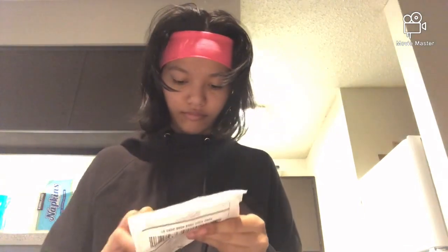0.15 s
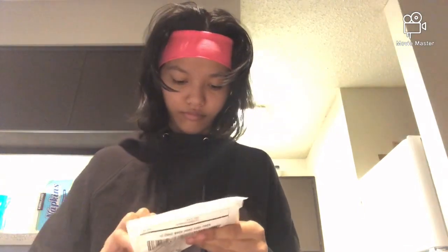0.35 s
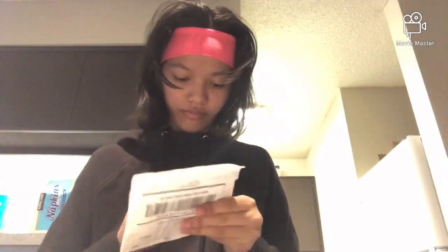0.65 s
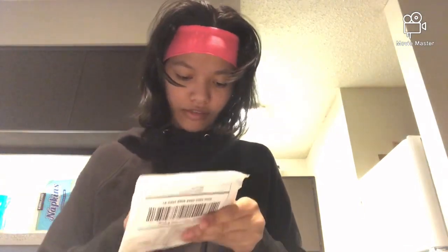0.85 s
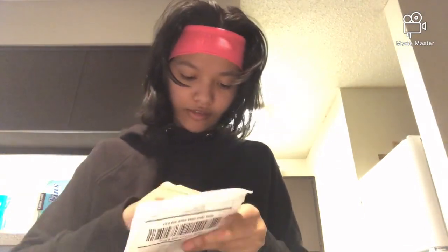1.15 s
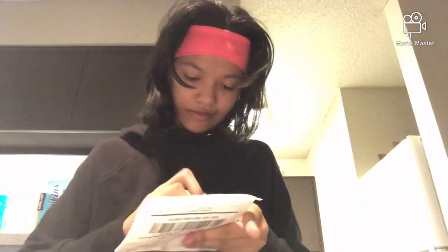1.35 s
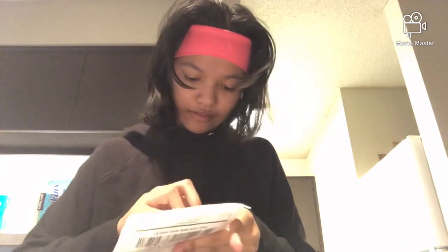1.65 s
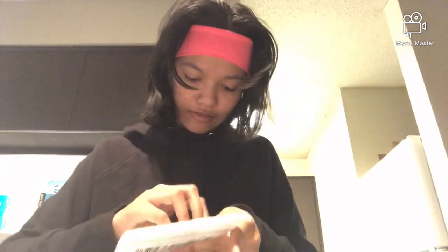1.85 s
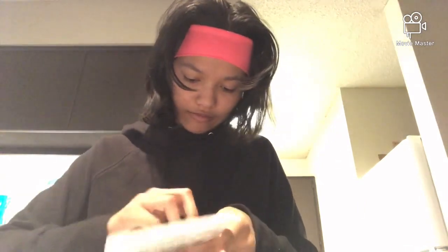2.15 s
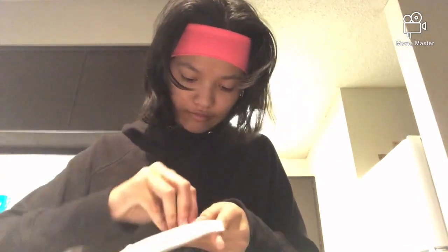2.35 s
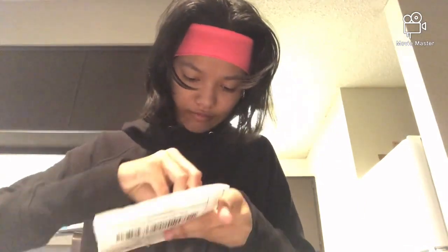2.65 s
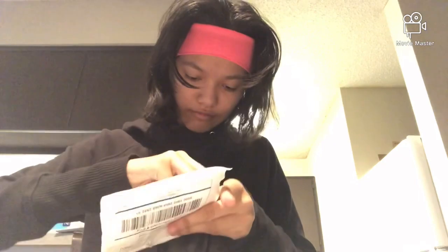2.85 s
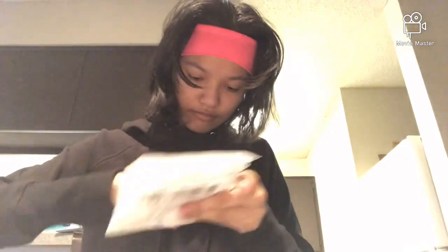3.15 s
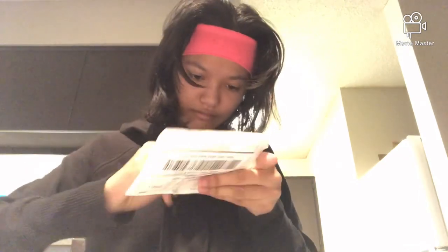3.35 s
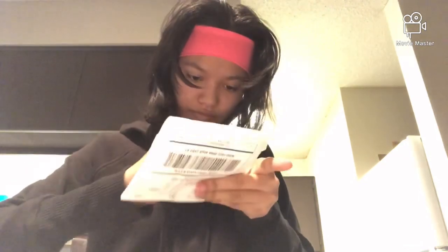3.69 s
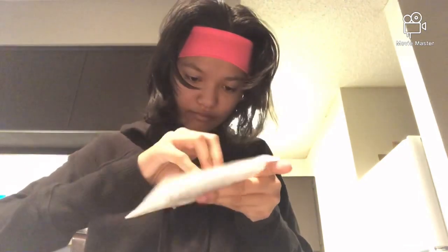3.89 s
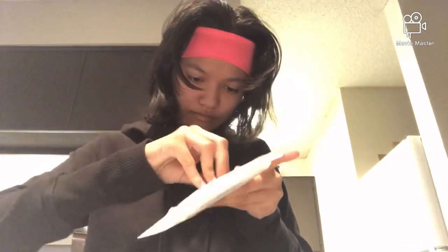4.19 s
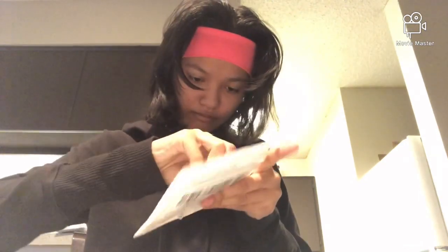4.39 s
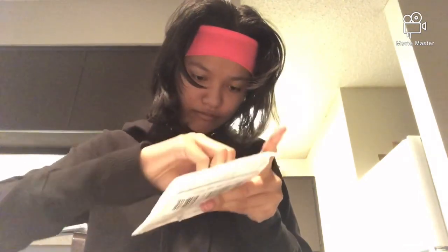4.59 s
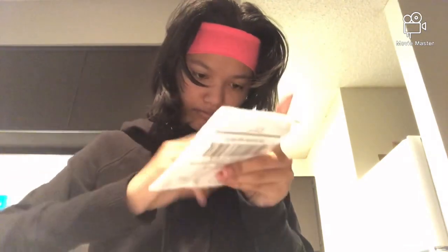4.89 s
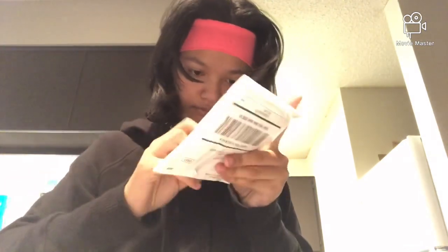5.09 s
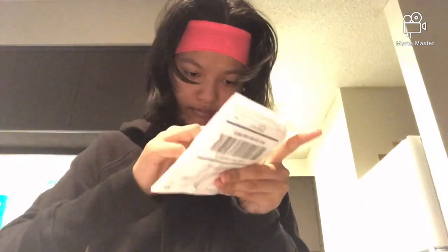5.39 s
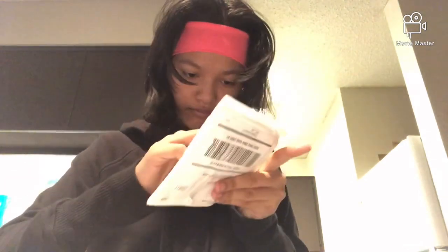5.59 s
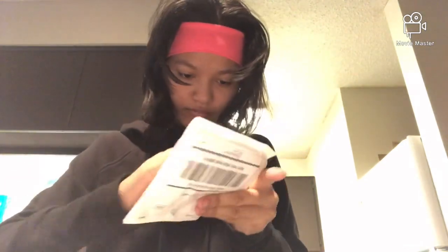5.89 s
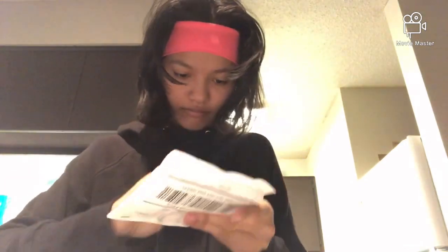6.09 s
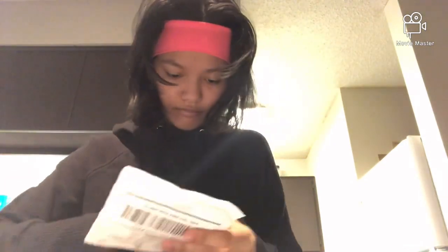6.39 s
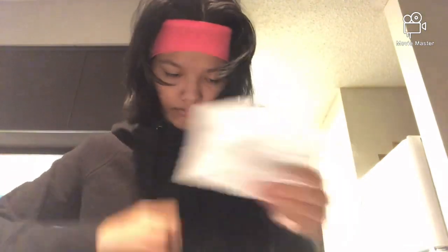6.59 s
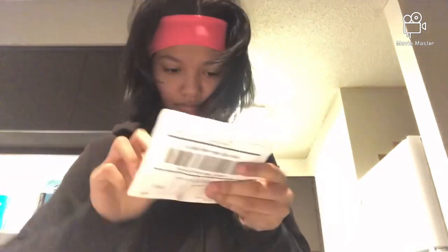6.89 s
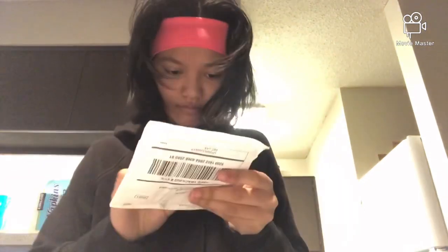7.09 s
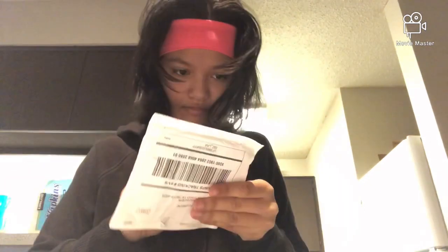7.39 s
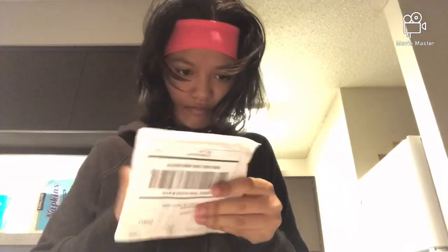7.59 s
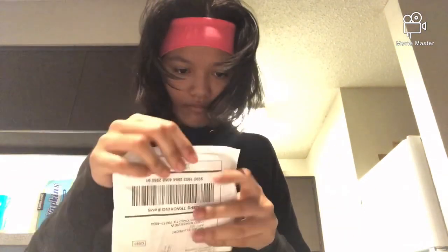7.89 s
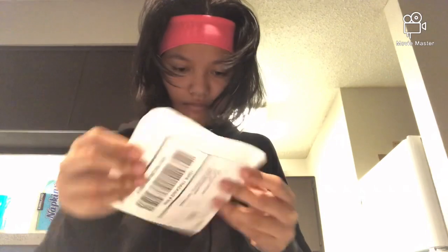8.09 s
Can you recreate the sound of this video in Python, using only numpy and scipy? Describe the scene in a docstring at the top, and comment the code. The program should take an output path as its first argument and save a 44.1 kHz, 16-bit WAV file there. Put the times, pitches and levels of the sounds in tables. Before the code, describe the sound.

Close, crisp paper crinkling in a quiet small room: uneven bursts of rustle, scattered bright ticks, a quieter middle, then one hard snap.

```python
"""Sharp crackles break at once from a dense rustle: hands turn, pick at and tear a paper mailing envelope.
The rustle sums many small buckling patches and rubbing noise, both driven by the strokes of the hands.
Distinct creases buckle singly as pops with bright ticks, and the whole envelope flexes with soft thumps.
Close to a phone in a small, quiet room, the walls answer briefly over a faint steady noise."""
import sys
import numpy as np
from scipy import signal
from scipy.fft import rfft, irfft, next_fast_len
from scipy.io import wavfile
from scipy.ndimage import uniform_filter1d

SR = 44100
rng = np.random.default_rng(int(sys.argv[2]) if len(sys.argv) > 2 else 0)


def wav_out(sig):
    """Save sig, one row per channel (or a flat mono array), as 16-bit PCM at SR to the path in sys.argv[1]."""
    wavfile.write(sys.argv[1], SR, np.round(np.clip(np.atleast_2d(sig).T, -1, 1) * 32767).astype(np.int16))


N = 363825
TIME = np.arange(N) / SR

# Distinct creases buckling, loud or standing alone. Columns: t/s, level over 1 ms/dB,
# nominal pitch of the buckling patch f/Hz, treble tick relative to that level/dB
DISTINCT_CREASES = [(0.0368, -36, 1810, -0.5), (0.0831, -18.5, 1705, -19), (0.2783, -38, 2900, -11),
                    (0.3939, -36.5, 1797, -10), (0.5003, -37, 1990, -5), (0.521, -32.5, 3100, -10.5),
                    (0.5468, -39, 2470, -16), (0.5855, -36.5, 2530, -16), (0.6254, -39.5, 1590, -21),
                    (0.6547, -36, 3500, -10.5), (0.7005, -34.5, 2580, -22), (0.7102, -31, 3970, -25),
                    (0.7464, -39, 2280, -10), (0.7659, -29.5, 2520, -10), (0.7889, -34, 5260, 0.5),
                    (1.0875, -42.5, 1918, -16), (1.1426, -39, 1202, -14), (1.197, -38.5, 1310, -16),
                    (1.2285, -33.5, 2980, -14), (1.2672, -37, 3220, -21), (1.306, -35.5, 3760, -4),
                    (1.4248, -35.5, 3520, -21), (1.4724, -39.5, 2800, -22), (1.485, -43, 3720, -4.5),
                    (1.519, -41, 4000, -5), (1.557, -35, 3300, -19), (1.7704, -35.5, 3130, -13),
                    (1.91, -38.5, 2230, -22), (1.925, -32.5, 4700, -2.5), (1.9883, -36.5, 2100, -14),
                    (1.9924, -36, 3180, -17), (2.1212, -33.5, 3470, -6), (2.141, -41, 2040, -25),
                    (2.1864, -41, 3350, 0), (2.2322, -38, 4870, -6), (2.2608, -38, 2170, -22),
                    (2.3274, -40.5, 4500, -4), (2.4373, -44, 4650, -3), (2.4646, -40, 3450, -18),
                    (2.5153, -40, 3900, -3), (2.7459, -40.5, 1280, -4.5), (2.7987, -40, 4150, -18),
                    (2.872, -37.5, 2090, -9), (2.9547, -35.5, 2500, -35), (2.996, -41.5, 2108, -15),
                    (3.0748, -36.5, 2960, -15), (3.094, -35.5, 2900, -22), (3.3547, -44.5, 1880, -15),
                    (3.4306, -45, 1705, -21.5), (3.4885, -39, 2730, -17), (3.6007, -42, 1300, -21.5),
                    (3.665, -41, 4150, 3.5), (3.6872, -37.5, 2100, -22), (3.798, -40.5, 2300, -4.5),
                    (3.8512, -38.5, 3530, -7), (3.935, -36, 2930, -5), (3.9739, -38, 2490, -6.5),
                    (4.0319, -43, 3450, -0.5), (4.0942, -45, 3100, 2.5), (4.2021, -40, 4190, 2),
                    (4.248, -38.5, 1210, -28), (4.276, -45, 2050, -7), (4.353, -44.5, 2200, -15),
                    (4.465, -43.5, 2800, 1), (4.6143, -30, 1827, -7), (4.651, -33, 2820, -7),
                    (4.8642, -46, 4400, -14), (5.095, -42, 1190, -7.5), (5.2838, -47, 3245, 2.5),
                    (5.3988, -43, 3940, -16), (5.598, -40, 2470, -14), (5.6737, -36.5, 2090, -5),
                    (5.723, -29.5, 2050, -15), (5.8093, -34, 2240, -28), (5.864, -37, 2510, 3),
                    (5.91, -36.5, 1834, -0.5), (5.928, -35.5, 1290, -11), (6.0146, -37, 2643, -10),
                    (6.041, -38.5, 1220, -6.5), (6.1701, -39.5, 1420, -27), (6.2035, -36.5, 2700, -15),
                    (6.212, -37, 4300, -10), (6.2318, -33, 2530, -10), (6.2822, -39.5, 1800, -4.5),
                    (6.3727, -32.5, 3080, -7.5), (6.3967, -22, 2230, -20), (6.414, -32.5, 2420, -0.5),
                    (6.444, -28.5, 2230, -7.5), (6.57, -39, 2057, -23), (6.6296, -32.5, 2600, -13),
                    (6.676, -41.5, 3210, .5), (7.079, -42.5, 3400, -5), (7.1625, -37.5, 1862, -18),
                    (7.2064, -40, 1760, -7), (7.2614, -36.5, 1670, -11), (7.8669, -39.5, 2980, -0.5),
                    (7.8786, -29.5, 2350, -13), (7.9192, -31.5, 1290, -8), (7.938, -33, 2030, -7)]


def crackles(cycles=0.42, sag=0.068, tick_s=0.00062, tick_hz=5200, splinter_db=-14, splinter_s=0.014,
             lag_s=0.000732, follow=0.58, follow_s=0.002035):
    """Snap-through buckling: each crease gives a pop, a second flip, a bright tick and a splutter of fibres."""
    out = np.zeros(N)
    t = np.arange(900) / SR
    for s, db, hz, treble_db in [*DISTINCT_CREASES, *lesser_creases()]:
        tick_noise, fibre_noise, scatter = rng.standard_normal((3, len(t)))
        ring = cycles * np.exp(0.2 * scatter[0])

        # the first flip tips a neighbouring patch over; the gap between them colours each crackle differently
        pop = np.zeros(len(t))
        add(pop, 0, buckle(hz, ring, sag))
        follow_delay = follow_s * rng.random() + 1 / hz
        follow_hz = hz * np.exp(scatter[2] / 5)
        add(pop, follow_delay, follow * buckle(follow_hz, ring, sag))
        polarity = np.sign(scatter[1])
        add(out, s - ring / hz / 2, polarity * burst(pop, db))

        tick = cut(tick_noise * np.exp(-t / tick_s), tick_hz, "highpass")
        tick = cut(tick, 12500, "lowpass")
        add(out, s, burst(tick, db + treble_db))

        # random gain from sample to sample makes the fibres uneven
        splutter = fibre_noise * np.exp(scatter - t / splinter_s)
        splutter = cut(cut(splutter, hz / 2, "highpass"), 2 * hz, "lowpass")
        add(out, s, burst(splutter, db + splinter_db))
    return disperse(out, lag_s)


# crease rate under a bare grip, and the rise in stroke level that doubles it
CREASES_PER_S, CREASE_DOUBLING_DB = 8, 18
# level over the stroke level, its random scatter, and the limit before scatter: a small crease stores only so much
CREASE_OVER_DB, CREASE_SCATTER_DB, CREASE_LIMIT_DB = 12.5, 1, -43
# tick level relative to the treble balance of the stroke, and its random scatter
CREASE_TICK_DB, TICK_SCATTER_DB = -7, 4.5
# pitch at an even treble balance; brighter strokes flip smaller patches
CREASE_HZ, CREASE_SCATTER_OCTAVES, CREASE_OCTAVES_PER_DB = 3160, 0.48, 0.05


def lesser_creases(count=2000):
    """A random point process: harder work buckles small creases more often and more loudly; rows as above."""
    when, chance = rng.random((count, 2)).T
    size, pitch, tick = np.clip(rng.standard_normal((count, 3)).T, -2, 2)
    s = when * N / SR
    level, bright = (np.interp(s, TIME, curve) for curve in effort())
    rate = CREASES_PER_S * 2 ** ((level - GRIP_DB) / CREASE_DOUBLING_DB)
    db = np.minimum(level + CREASE_OVER_DB, CREASE_LIMIT_DB) + CREASE_SCATTER_DB * size
    hz = CREASE_HZ * 2 ** (CREASE_OCTAVES_PER_DB * bright + CREASE_SCATTER_OCTAVES * pitch)
    tick_db = bright + CREASE_TICK_DB + TICK_SCATTER_DB * tick
    # thin the candidates to the wanted rate
    kept = chance < rate * N / SR / count
    return np.column_stack([s, db, hz, tick_db])[kept]


def buckle(hz, cycles, sag):
    """Dispersive bending: a patch flips in a swing or two that sags in pitch, as slow waves arrive last."""
    turns = np.arange(int(8 * SR / hz)) * hz / SR
    age = turns / cycles  # the swell peaks at age 1
    swell = age ** 2 * np.exp(-2 * age)
    phase = 2 * np.pi * turns * (1 + sag) / (1 + sag * age / 2)
    swing = swell * np.sin(phase)
    return cut(np.pad(swing, (0, len(swing))), hz / 4, "highpass")


# Relative colour of the rustling paper, before its two bands are levelled. Columns: f/Hz, level per Hz/dB
PAPER_COLOUR = [(50, -22.5), (130, -10), (320, -6.5), (500, -2.5), (690, -10), (1170, 4), (1700, -4),
                (2400, -1), (3500, -2.5), (4700, -8), (7700, -4.5), (8800, -11), (15500, -9.5)]


def rustle(rate=150, spread_db=6.5, rub=0.55, flutter_db=4.5, trim_db=-1, steady_s=0.045,
           softening=0.19, drag=0.5):
    """Superposed buckling and friction: crinkles of every size, in flurries, over the smooth hiss of rubbing."""
    level, bright = effort()
    pitches = np.geomspace(150, 14000, 16)
    # mid-sized patches flip in distinct jerks; broad folds and single fibres give way more evenly
    spreads_db = spread_db / (1 + softening * np.log(pitches / 2000) ** 2)
    grains = np.zeros(N)
    for hz, db in zip(pitches, spreads_db):
        pitch_rate = rate * np.sqrt(hz / 2000)  # flips per second
        grains += np.sqrt(hz) * crinkles(hz, pitch_rate, db, cycles=0.6, sag=0.25)
    flurry = undb(flutter_db * unit(uniform_filter1d(rng.standard_normal(N), size=200)))

    # a light touch only crinkles; a firm pull also drags paper over paper
    hiss = rub * undb(drag * (level - level.mean())) * rng.standard_normal(N)
    paper = shape(flurry * (unit(grains) + hiss), PAPER_COLOUR)
    paper = disperse(paper, 0.0015)

    # the hand sets the power released, however it is shared among the crinkles
    body = steady(cut(paper, 5500, "lowpass", order=5), steady_s)
    treble = steady(cut(paper, 5500, "highpass", order=5), steady_s)
    return body * undb(level + trim_db) + treble * undb(level + bright + trim_db)


def steady(x, window_s):
    """Short-time power normalization: divide by the running rms."""
    return x / np.sqrt(uniform_filter1d(x ** 2, int(window_s * SR)) + 1e-12)


def crinkles(hz, rate, spread_db, cycles, sag):
    """Shot noise: patches of about one size flip at random moments, many faint and a few strong."""
    sizes = undb(spread_db * np.minimum(rng.exponential(size=N), 4))
    signed_sizes = sizes * rng.choice([-1, 1], N)
    flips = signed_sizes * (rng.random(N) < rate / SR)
    return unit(signal.oaconvolve(flips, buckle(hz, cycles, sag))[:N])


# Strokes of the hands that rub, pick or tear. Columns: start t/s, attack/s, hold/s,
# level before the rustle's trim/dB, treble relative to body/dB
HAND_STROKES = [(0.0, 0.0087, 0.046, -56, -5.5), (0.063, 0.012, 0.029, -48.5, -5),
                (0.288, 0.012, 0.05, -60.5, -8), (0.343, .045, 0.0083, -44.5, -8),
                (0.456, 0.033, 0.035, -47.5, -7), (0.621, 0.14, .035, -46.5, -8),
                (0.88, .03, 0.0054, -59, -17), (0.996, 0.0066, 0.052, -57, -6),
                (1.123, 0.016, 0.018, -47.5, -9.5), (1.186, 0.027, .05, -52, -7.5),
                (1.378, 0.01, 0.019, -55, -3), (1.48, 0.0093, 0.071, -60, -1),
                (1.645, 0.056, 0.024, -51, -5), (1.908, 0.0088, 0.069, -57, -3.5),
                (2.112, 0.0046, 0.011, -50, -5), (2.173, .045, .03, -52, -9),
                (2.31, 0.0061, 0.016, -57, -1), (2.403, 0.04, 0.13, -65, -8.5),
                (2.668, 0.064, 0.0061, -54, -18), (2.871, 0.0082, 0.0046, -57.5, -2),
                (3.024, 0.02, 0.077, -49, -6), (3.203, 0.03, 0.44, -65, -6),
                (3.601, 0.066, 0.0068, -51, -5.5), (3.72, 0.013, 0.38, -63, -4),
                (3.835, .008, 0.0048, -52, -8), (4.162, 0.043, 0.0095, -53, -5),
                (4.305, 0.022, 0.15, -64.5, -7.5), (4.592, 0.0055, 0.087, -48, -3),
                (4.856, 0.0042, 0.0041, -62.5, -12), (4.99, 0.0071, 0.21, -65, -3.5),
                (5.274, 0.0053, 0.0046, -62.5, -6), (5.379, 0.0094, 0.0088, -60, -1),
                (5.524, 0.0066, .015, -61, -2.5), (5.585, 0.084, 0.039, -52.5, -5),
                (5.782, 0.035, 0.12, -48.5, -3.5), (5.97, .01, 0.12, -59, -2.5),
                (6.114, 0.034, 0.13, -54.5, -10.5), (6.389, 0.0053, 0.014, -33.5, -8),
                (6.546, 0.069, 0.038, -50.5, -5), (6.686, 0.052, 0.035, -53.5, -2.5),
                (6.914, 0.0066, 0.05, -49, -9.5), (7.036, 0.044, 0.042, -51, -3.5),
                (7.192, 0.0066, 0.049, -57.5, -5.5), (7.442, 0.05, 0.062, -54, -9.5),
                (7.591, 0.14, 0.16, -50.5, -4.5), (7.899, 0.012, .008, -45.5, -12),
                (7.967, 0.018, 0.031, -54.5, -5), (8.116, 0.022, .11, -66, -2.5)]
RELEASE_S = 0.037  # decay constant as the paper settles after each stroke
GRIP_DB, GRIP_TREBLE_DB = -71.5, -4  # the fingers never hold quite still; level before trim, relative treble


def effort():
    """Power addition: strokes build, hold and die away above the grip; returns body level and treble balance/dB."""
    body = np.full(N, undb(GRIP_DB) ** 2)
    treble = body * undb(GRIP_TREBLE_DB) ** 2
    for s, attack_s, hold_s, db, treble_db in HAND_STROKES:
        age = TIME[:SR] - attack_s
        rise = np.clip(1 + age / attack_s, 0, 1)
        release = np.exp(-np.maximum(age - hold_s, 0) / RELEASE_S)
        power = (undb(db) * rise * release) ** 2
        add(body, s, power)
        add(treble, s, power * undb(treble_db) ** 2)
    return 10 * np.log10(body), 10 * np.log10(treble / body)


def disperse(x, lag_s):
    """Bending-wave dispersion: speed grows as root frequency; group delay is lag_s * (1 / sqrt(kHz) - 1/2)."""
    khz = np.fft.rfftfreq(N, 1 / SR) / 1000
    turns = 1000 * lag_s * (2 * np.sqrt(khz) - khz / 2)
    return irfft(rfft(x) * np.exp(-2j * np.pi * turns), N)


# The whole envelope flexing. Columns: t/s, level over 1 ms/dB, nominal pitch f/Hz
ENVELOPE_FLEXES = [(0.087, -38.5, 207), (0.388, -46, 171), (1.16, -61, 190), (2.738, -49.5, 402),
                   (6.4, -26, 292), (6.412, -28.5, 520), (6.417, -35, 133), (7.744, -44.5, 270),
                   (7.81, -41, 434), (7.926, -39.5, 474), (8.209, -45.5, 107)]


def flexes(cycles=0.78, sag=0.032):
    """Size scaling of buckling: the broad faces of the envelope flip like a crease, but far lower."""
    out = np.zeros(N)
    for s, db, hz in ENVELOPE_FLEXES:
        add(out, s - cycles / hz / 2, burst(buckle(hz, cycles, sag), db))
    return out


# Colour of the room's answer. Columns: f/Hz, gain/dB
WALL_COLOUR = [(100, -5.5), (145, 4.5), (200, -10), (280, -0.5), (520, 4), (700, -3.5), (1250, -3),
               (1900, -2.5), (6000, 3)]


def room(x, size=16384):
    """Time-varying reflection: the envelope keeps moving, so each moment meets its own pattern of echoes."""
    fade = signal.windows.hann(size, sym=False)
    padded = np.pad(x, size)
    wet = np.zeros(len(padded))
    for i in range(0, N + size, size // 2):
        moment = padded[i:i + size] * fade
        add(wet, i / SR, signal.fftconvolve(moment, answer()))
    return x + shape(wet[size:size + N], WALL_COLOUR)


def answer(early_db=-12, early_s=0.0083, gap_s=0.005, tail_db=-13, t60=0.61, treble_t60=0.22):
    """Diffuse decay: near surfaces scatter a click back in milliseconds; a tail follows, duller as it fades."""
    t = np.arange(SR // 2) / SR
    near, low, high = rng.standard_normal((3, len(t)))
    early = near * np.exp(-t / early_s)
    low_tail = cut(low, 4500, "lowpass") * np.exp(-np.log(1000) * t / t60)
    high_tail = cut(high, 3700, "highpass") * np.exp(-np.log(1000) * t / treble_t60)
    tail = low_tail + high_tail
    # each part is set by its total energy
    both = undb(early_db) * early / np.linalg.norm(early) + undb(tail_db) * tail / np.linalg.norm(tail)
    return np.pad(both, (int(gap_s * SR), 0))


# Relative colour of the steady room noise. Columns: f/Hz, level per Hz/dB
AIR_COLOUR = [(25, -9), (50, 2.5), (140, 6.5), (280, 5), (520, 3), (750, -1.5), (1200, -6), (3000, -6.5),
              (7500, -10.5), (9000, -11), (16000, -18.5)]
AIR_DB = -68.5  # rms level


def air():
    """Stationary filtered noise: the faint steady sound of the room."""
    return undb(AIR_DB) * unit(shape(rng.standard_normal(N), AIR_COLOUR))


def undb(db):
    """Logarithmic level: decibels to amplitude gain."""
    return 10 ** (np.asarray(db) / 20)


def unit(x):
    """Mean-square normalization: scale to an rms of one."""
    return x / np.sqrt(np.mean(x ** 2))


def burst(x, db):
    """Energy equivalence: scale a short sound to the energy of one millisecond at this level."""
    return x * undb(db) * np.sqrt(SR / 1000 / np.sum(x ** 2))


def add(out, s, x):
    """Linear superposition: mix a short sound in at time s."""
    i = max(int(s * SR), 0)
    out[i:i + len(x)] += x[:max(len(out) - i, 0)]


def cut(x, hz, kind, order=2):
    """Butterworth filtering: low-pass or high-pass."""
    return signal.sosfilt(signal.butter(order, min(hz, 0.45 * SR), kind, fs=SR, output="sos"), x)


def shape(x, points):
    """Minimum-phase filtering to a spectrum of (f/Hz, level/dB) points; causal, so attacks stay sharp."""
    size = next_fast_len(len(x) + 4096, real=True) * 2
    hz, db = np.transpose(points)
    log_hz = np.log(np.fft.rfftfreq(size, 1 / SR) + 1)
    log_gain = np.log(undb(np.interp(log_hz, np.log(hz), db)))
    # folding the cepstrum forward in time gives the causal phase
    cepstrum = irfft(log_gain)
    cepstrum[1:size // 2] *= 2
    cepstrum[size // 2 + 1:] = 0
    return irfft(rfft(x, size) * np.exp(rfft(cepstrum)))[:len(x)]


def scene():
    """Superposition of sources: the envelope in its room, over the room noise."""
    envelope = crackles() + flexes() + rustle()
    return (room(envelope) + air())[None]


def record(dry):
    """Band limiting: the phone cuts the top of the treble, above 16 kHz."""
    return signal.sosfilt(signal.ellip(10, 0.2, 70, 16000, fs=SR, output="sos"), dry)


dry = scene()
out = record(dry)
wav_out(out)
```